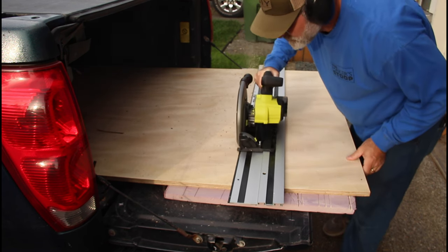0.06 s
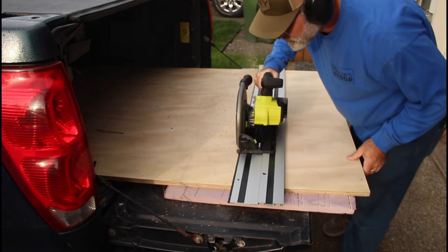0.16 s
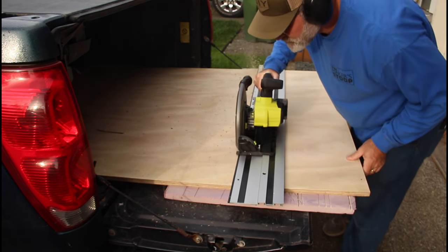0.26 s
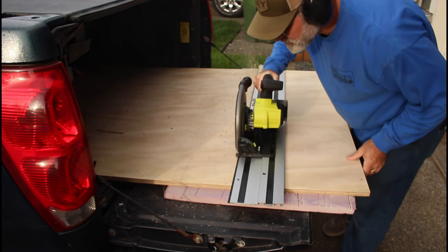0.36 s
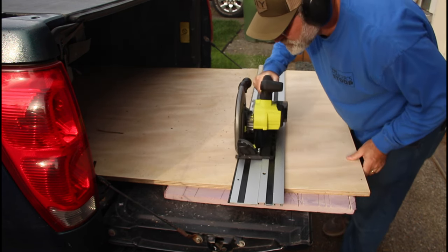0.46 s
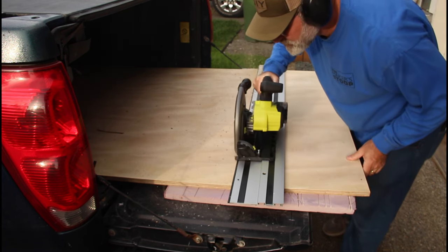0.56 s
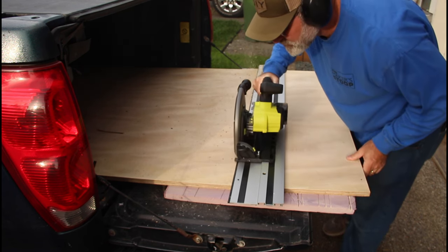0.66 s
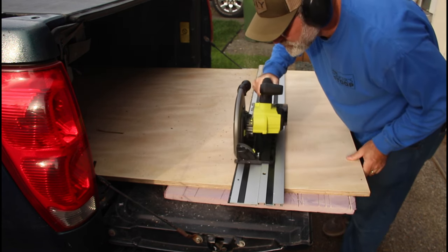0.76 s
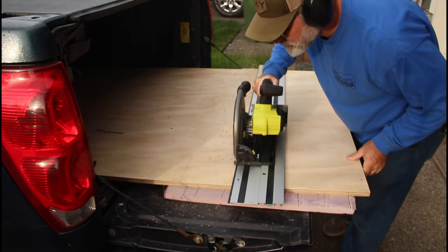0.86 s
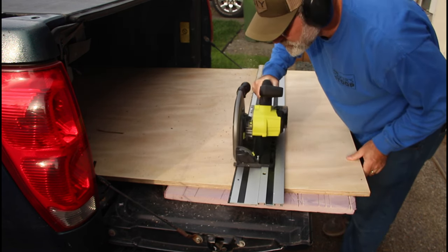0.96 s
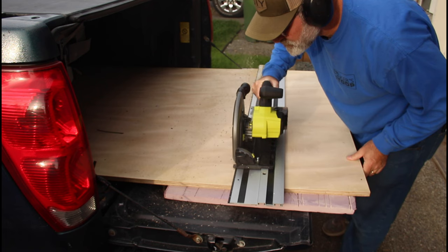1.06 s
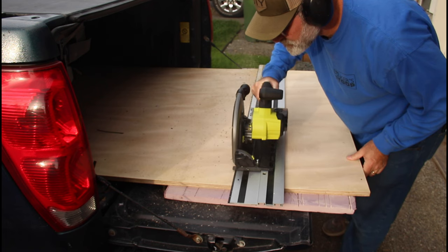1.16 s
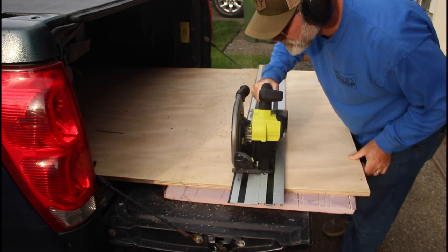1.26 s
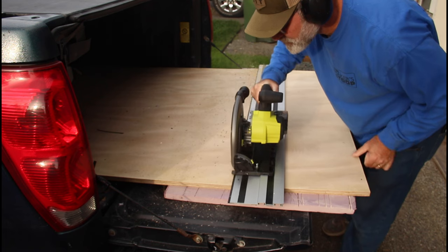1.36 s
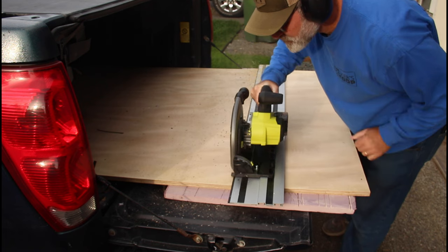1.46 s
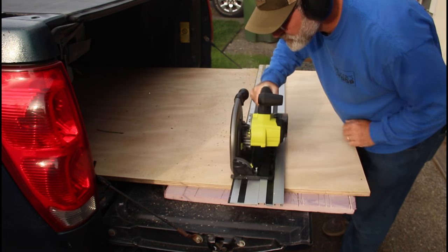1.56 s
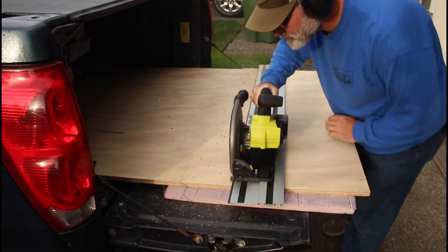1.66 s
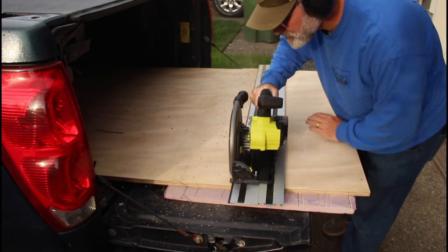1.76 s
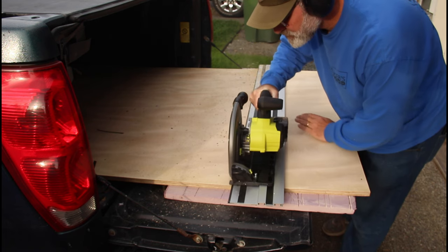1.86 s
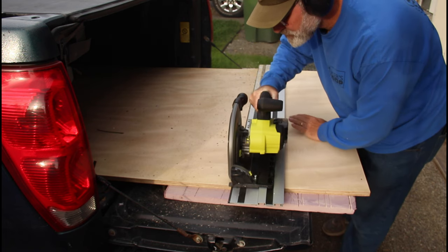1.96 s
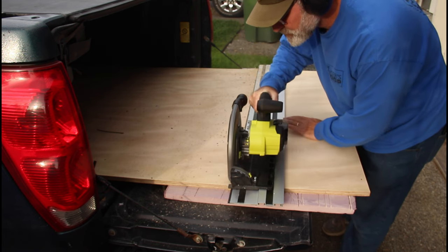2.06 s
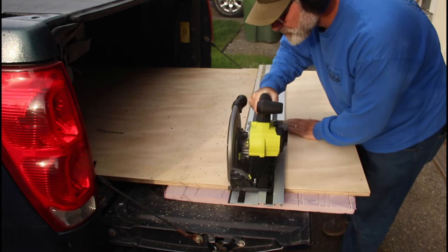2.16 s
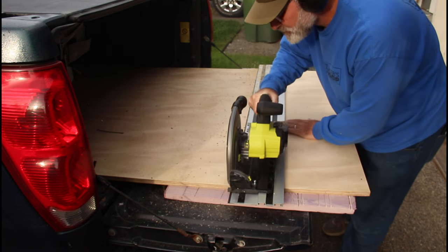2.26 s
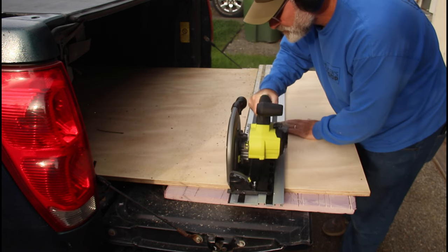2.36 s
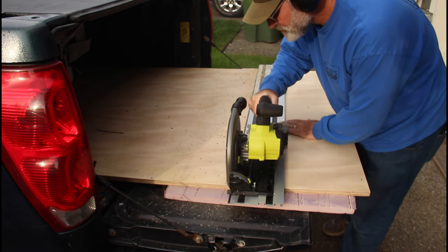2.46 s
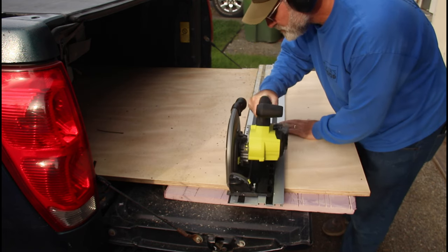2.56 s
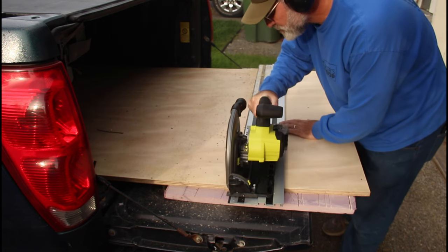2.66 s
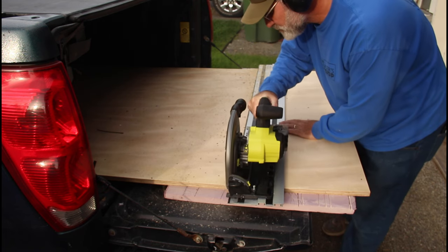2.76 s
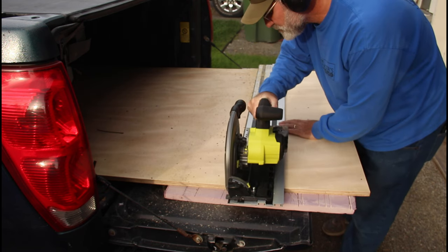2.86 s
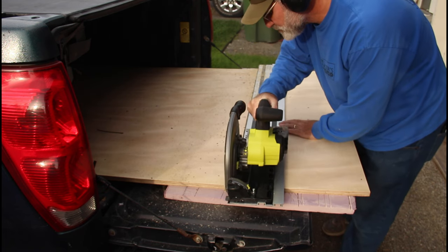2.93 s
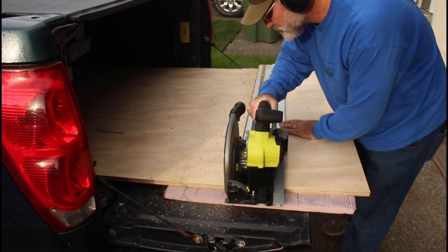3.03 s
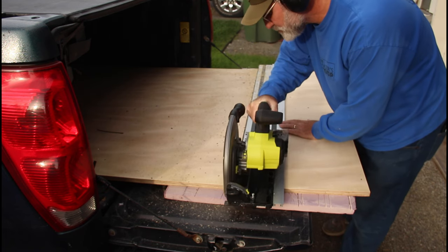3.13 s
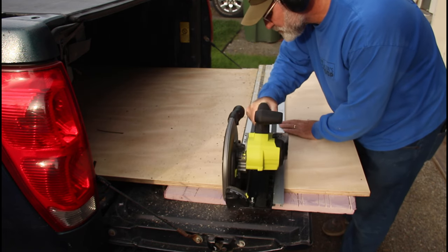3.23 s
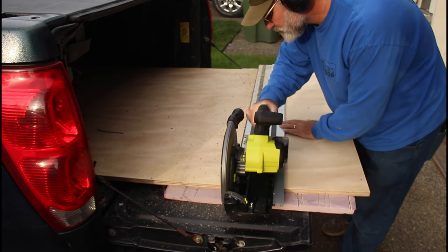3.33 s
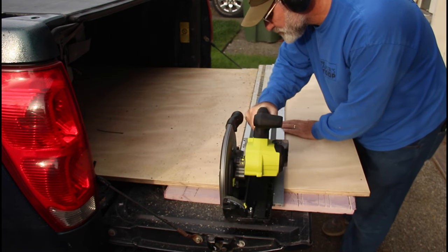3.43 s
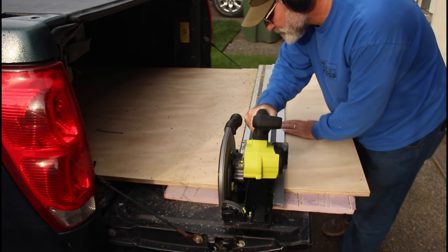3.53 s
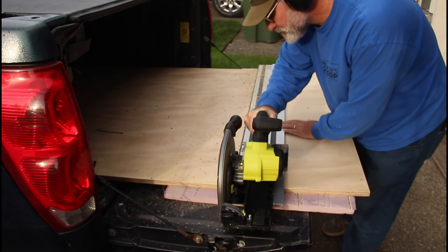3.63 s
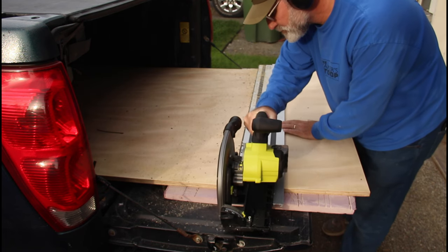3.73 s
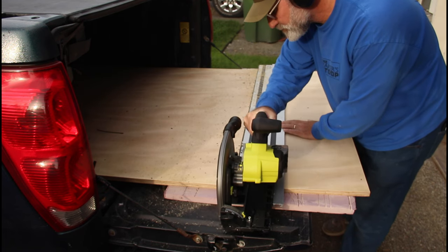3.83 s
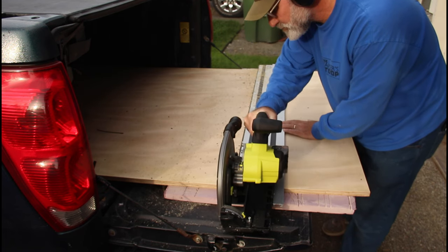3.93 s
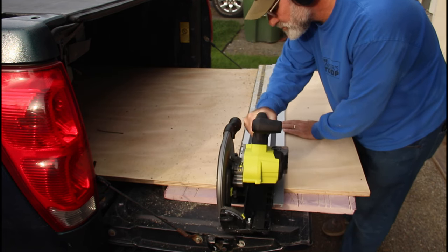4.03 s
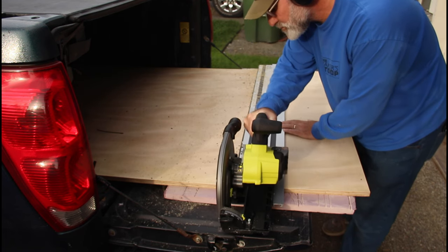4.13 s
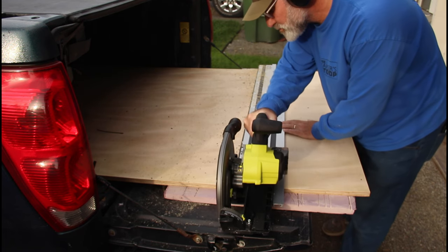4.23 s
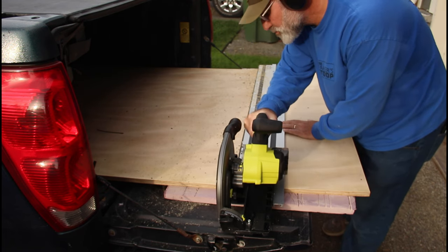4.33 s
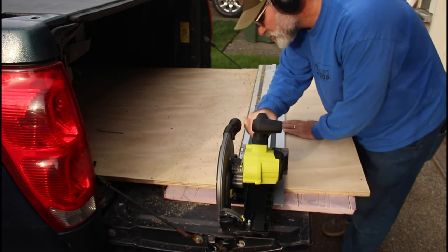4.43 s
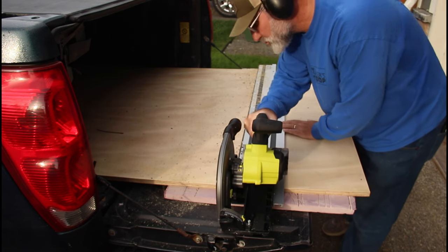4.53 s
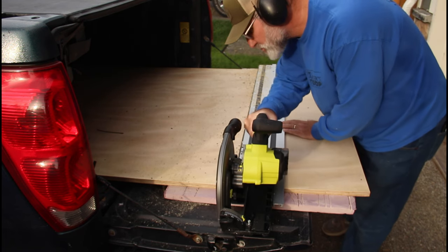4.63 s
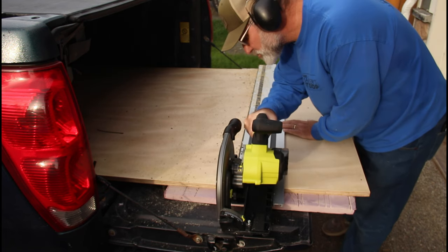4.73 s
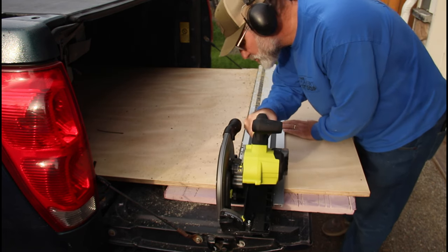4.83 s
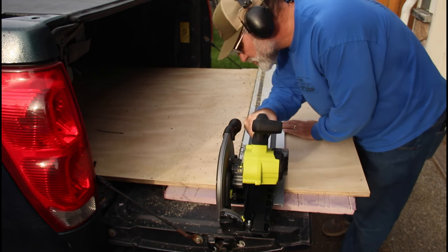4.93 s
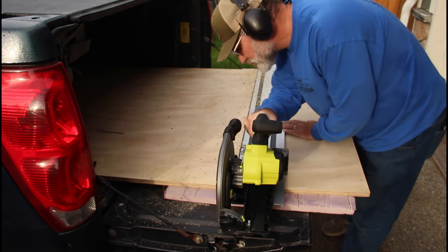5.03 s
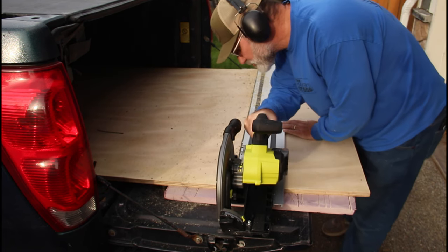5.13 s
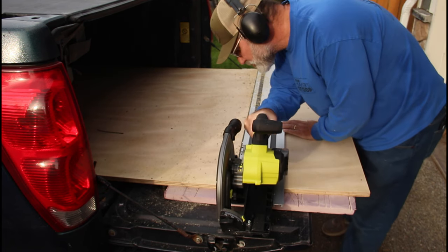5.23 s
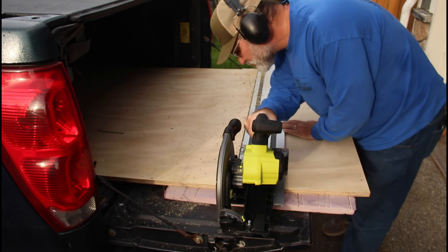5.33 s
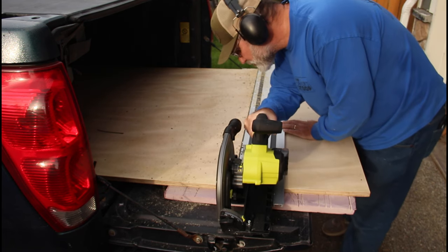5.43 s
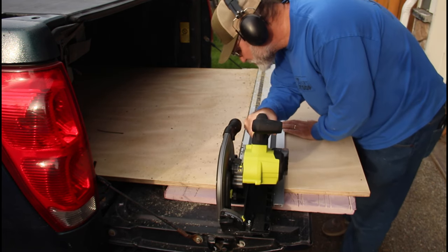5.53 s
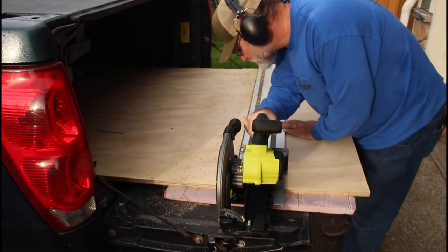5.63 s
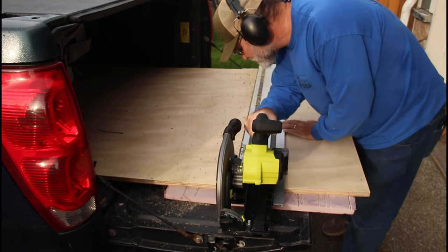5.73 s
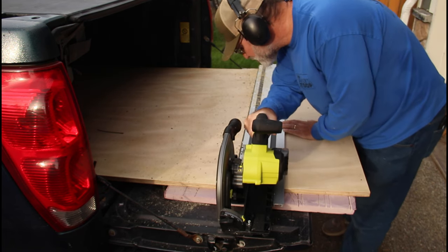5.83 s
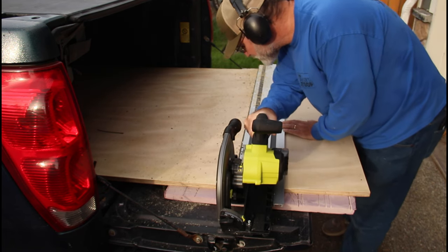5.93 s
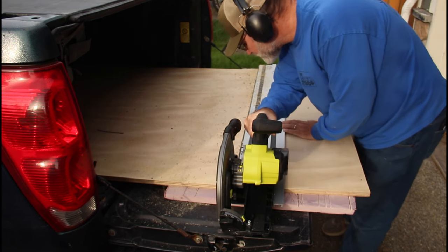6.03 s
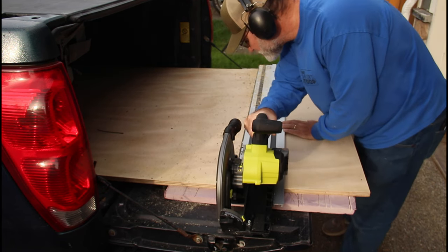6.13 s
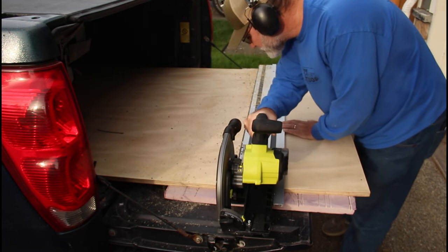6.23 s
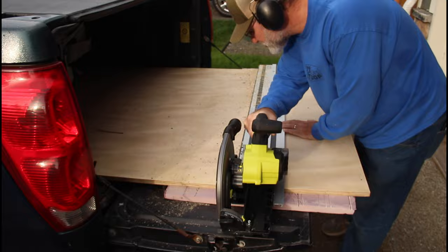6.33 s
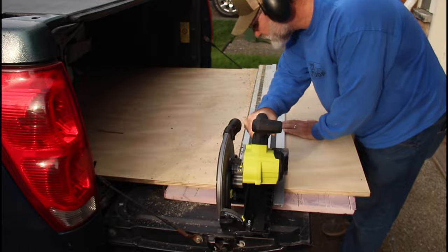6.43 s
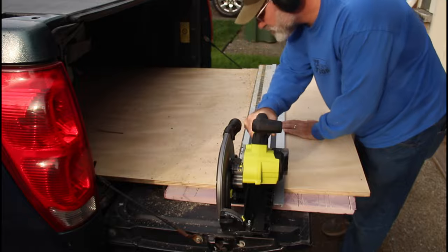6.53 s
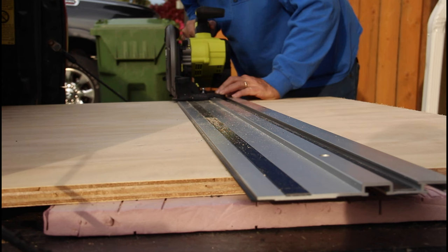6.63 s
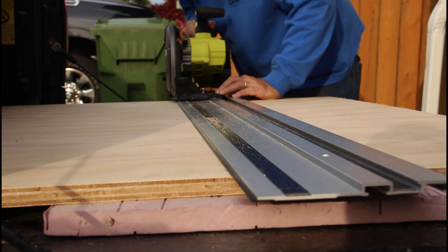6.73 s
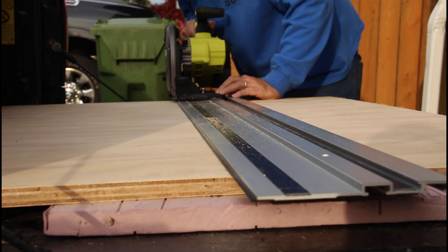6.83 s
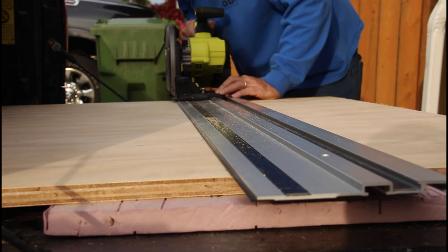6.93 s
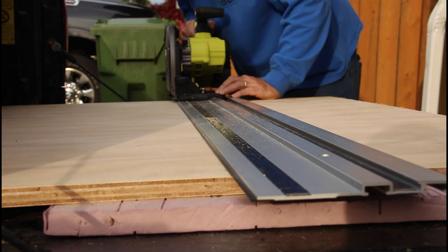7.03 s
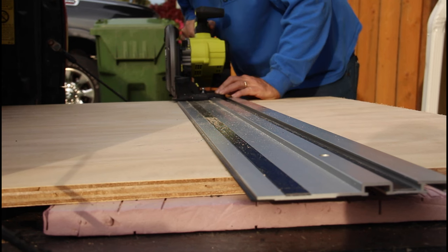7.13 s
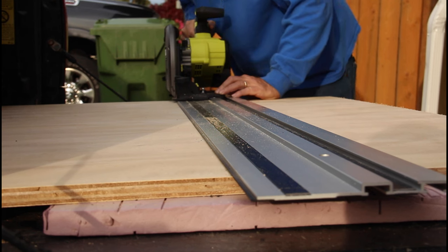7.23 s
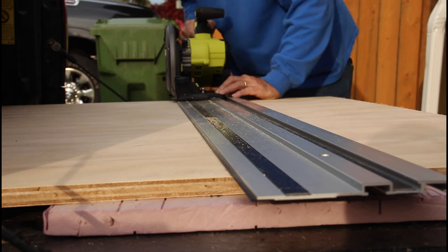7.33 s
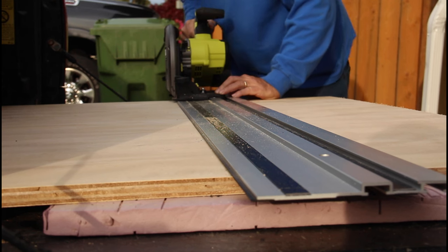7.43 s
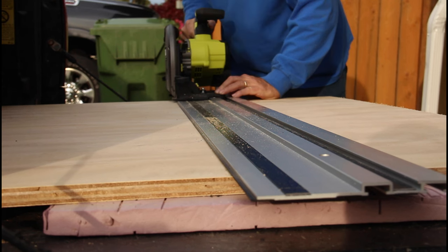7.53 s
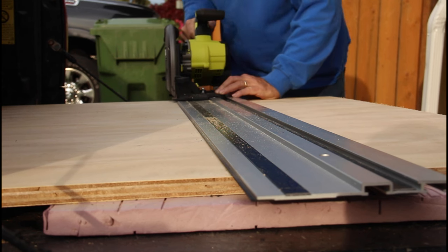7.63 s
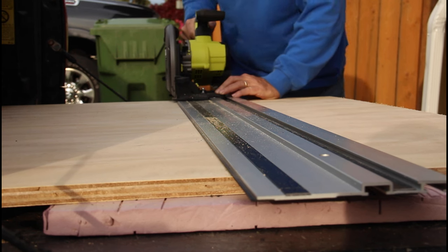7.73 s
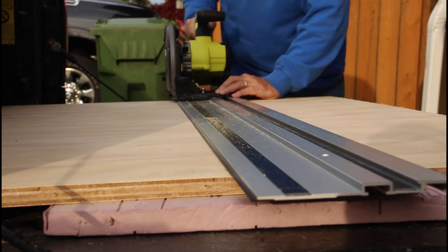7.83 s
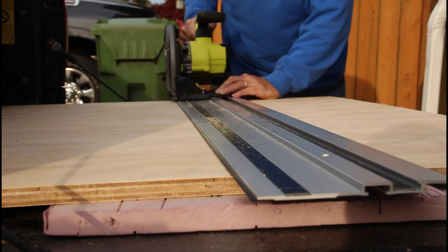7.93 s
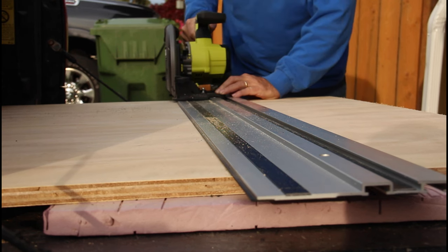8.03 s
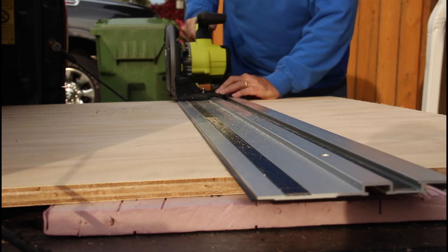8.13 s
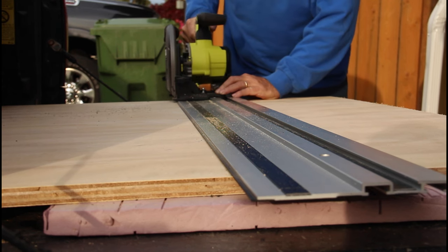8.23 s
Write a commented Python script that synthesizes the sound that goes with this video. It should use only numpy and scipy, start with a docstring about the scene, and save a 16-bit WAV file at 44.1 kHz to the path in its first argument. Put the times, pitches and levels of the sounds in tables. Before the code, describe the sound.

A dry, centred outdoor scene by a truck tailgate. From 0 to about 3.2 seconds a cordless circular saw cuts plywood close by: a strong, slightly wavering motor and gear whine, rough housing buzz and bright hissing chips, over low breeze rumble. Around 3.2 to 3.4 seconds it breaks out of the wood; the pitch lifts a little, the hiss thins and the loose guard flutters quickly. At about 4.26 seconds the brake grips with a jolt and sharp knock, and the whine falls fast, then more slowly, ringing and fluttering, to a ticking crawl by 6.6 seconds with tiny clicks. The perspective changes to the far end of the sheet, with quiet street air. A small knock comes at 6.87, a trigger click at 7.08, then the saw whirs upward with faint high whistles until about 7.7, bites near 8 and grows rougher as it cuts to the end.

```python
"""A cordless circular saw on a rail finishes a cut in plywood on a tailgate, near at hand, over breeze rumble.
It breaks out of the wood and runs free, its guard fluttering; the brake whines it down to a crawl.
From the far end of the sheet, over a quiet street, the trigger clicks and the saw spins up and bites again.
Sines locked to the shaft make the shaft, gear and fan tones; filtered noise throbbing with the
shaft and blade rings the housing, gearbox and blade, with a hiss of chips and air on top."""
import sys
import numpy as np
from scipy import signal
from scipy.fft import rfft, irfft
from scipy.io import wavfile
from scipy.ndimage import uniform_filter1d

SR = 44100
rng = np.random.default_rng(int(sys.argv[2]) if len(sys.argv) > 2 else 0)


def put_to_file(sound):
    """Save the sound as 16-bit audio at rate SR, in the file named by the first command-line argument."""
    columns = np.atleast_2d(sound).T  # one column per channel
    safe = np.clip(columns, -1, 1)
    whole_steps = np.round(safe * 32767)
    wavfile.write(sys.argv[1], SR, whole_steps.astype(np.int16))


N = 365148
T = np.arange(N) / SR  # t/s
FREE_HZ, SAG_HZ = 476, 30  # shaft speed running free; drop below it that counts as full load
BLADE_RATIO = 7 / 46  # blade turns per shaft turn

# cut and free run: [t/s, shaft f/Hz, bite (1 = full), main mesh swell level/dB, upper partners' swell level/dB]
NEAR_RUN = [(0.0, 441, 0.81, 0, 2.5), (0.39, 444, 0.87, -8, 1.5), (0.8, 444.6, 0.9, 0.5, 2),
            (1.1, 444.8, 1, 5.5, -7.5), (1.45, 440.8, 1.02, 4.5, -1.5), (1.72, 442.7, 0.97, 5, 8),
            (1.88, 443.7, 1.05, -1, -2), (2.11, 443.5, 0.98, 5, 6), (2.31, 447.5, 1, -7, 8),
            (2.45, 450, 0.99, 1.5, 5), (2.64, 452.8, 0.98, 0.5, 5.5), (2.9, 451.2, 1.16, -5.5, 7),
            (3.08, 446.4, 1.14, -9.5, 5.5), (3.18, 450.2, 1.04, -4.5, 10.5), (3.3, 466.2, 0.34, 3.5, 2),
            (3.42, 472, 0.022, 5.5, 17.5), (3.7, 476, .01, 9, -1), (4.255, 475.8, 0.012, 7, -5)]
# spin-up and second bite: [t/s, shaft f/Hz, bite (1 = full)]
FAR_RUN = [(7.078, 30.33, 0.0067), (7.128, 59.06, 0.011), (7.278, 172.5, .01), (7.386, 251.4, .01),
           (7.508, 337.5, 0.011), (7.63, 419.8, 0.0097), (7.71, 450.4, .02), (7.8, 458.3, 0.066),
           (8.094, 463, 0.2), (8.28, 455.7, 0.55)]
# level law of each layer before its trims:
# [free-speed level/dB, dB added by full bite, dB lost per halving of speed, dB lost per halving squared]
NEAR_LAWS = dict(shaft=(-40.5, 2.5, -4, 0), mesh=(-40.5, 6.5, 4.5, 3.5), fan=(-44.5, 2, -4.5, 2),
             housing=(-45.5, 5, 13, 1.5), gearbox=(-41.5, 7.5, 23.5, 1.5), blade=(-41.5, 2.5, -3, -1.5),
             hiss=(-49, 16.5, -4.5, -1.5))
FAR_LAWS = dict(shaft=(-52.5, 5, 0, 8.5), mesh=(-44.5, 18, -4, 2.5), fan=(-45.5, -15, 21, 0),
            housing=(-47.5, 6, 5, -1), gearbox=(-45, 4, 0.5, 0.84), blade=(-44, -3, 5.5, 0.2),
            hiss=(-53.5, 21.5, 8.5, -0.5))
# tones of each family as multiples of the shaft speed: [multiple]
SHAFT_ORDERS = (1, 2, 3, 4, 2 * BLADE_RATIO, 4 * BLADE_RATIO)
MESH_ORDERS = (7, 5, 6, 8, 14, 15, 7 + BLADE_RATIO, 7 + 2 * BLADE_RATIO, 7 + 4 * BLADE_RATIO, 7 + 8 *
               BLADE_RATIO)
FAN_ORDERS = (13, 26)
# balance within each family, one row per multiple: [free level/dB, loaded level/dB]
SHAFT_BALANCE = [(-1, 1), (0, -6.5), (-17, -11), (-14.5, -11), (-50, -31.5), (-32, -18)]
NEAR_MESH_BALANCE = [(-6, 0.5), (-19, -9), (-10, -7.5), (-20, -8), (-42.5, -8), (-37.5, -9), (-32.5, -24.5),
                     (-17.5, -11), (-5, -13), (-3, -26.5)]
FAR_MESH_BALANCE = [(-13, 0), (-26, -14), (-12, -7), (-12, -1), (-33, -1), (-37.5, 1), (-10, -6), (-10, -6),
                    (-10, -7), (-15, -22)]
FAN_BALANCE = [(8, -0.5), (-10, -14)]


def motor(run, laws, mesh_balance, treble_db, wobble_db, smear_db):
    """Shaft, gear mesh, fan and blade wobble under power; load shows as sag below free speed."""
    (hz, bite, *swells), gate = read(run)
    main_db, upper_db = swells or (0, 0)
    turns = np.cumsum(hz) / SR
    load = np.clip((FREE_HZ - hz) / SAG_HZ, 0, 1)
    shaft_db = law(laws["shaft"], hz, bite) + passing("shaft", hz)
    mesh_db = law(laws["mesh"], hz, bite)
    fan_db = law(laws["fan"], hz, bite)

    wobble = undb(shaft_db + wobble_db) * np.sin(2 * np.pi * BLADE_RATIO * turns)
    shaft = undb(shaft_db) * family(SHAFT_ORDERS, SHAFT_BALANCE, turns, load, 0, wander_db=0.1)
    mesh = family(MESH_ORDERS, mesh_balance, turns, load, treble_db, wander_db=1.0, rate=27,
                  main_db=main_db, upper_db=upper_db, lit_hz=None if swells else hz)
    smear = undb(smear_db) * load * blur(turns, 7.0, 2.2)  # uneven teeth smear the mesh
    fan = undb(fan_db) * family(FAN_ORDERS, FAN_BALANCE, turns, load, treble_db, wander_db=1.5)
    return gate * (wobble + shaft + undb(mesh_db) * (mesh + smear) + fan)


# how well the casing radiates a passing tone: [f/Hz, level/dB]
CASING = [(200, -28), (400, -11), (750, -9), (1000, 0), (1280, 1), (1550, -14), (1900, -1), (2250, -22),
          (2600, 4), (3150, 2), (3350, -13), (3700, -4), (4100, -4), (4400, -20), (12000, -30)]
# one mesh partner crosses a gearbox mode: [t/s, width/s, level/dB]
PARTNER_RING = (2.87, 0.13, 8)


def family(orders, balance, turns, load, treble_db, wander_db=2.5, rate=25, lit_hz=None,
           main_db=0, upper_db=0):
    """Tones locked to the shaft; each wavers by itself and the balance shifts with load."""
    ring_s, ring_width_s, ring_db = PARTNER_RING
    if lit_hz is None:
        jitter, jitter_rate = 0.1, rate
    else:
        jitter, jitter_rate = 0.9, 80
    tones = 0
    for m, (free_db, loaded_db) in zip(orders, balance):
        ringing_partner = 7.2 < m < 7.4
        db = free_db + (loaded_db - free_db) * load + treble_db * (m > 13) + wander_db * walk(rate)
        db = db + main_db * (m == 7) + upper_db * (m == 8 or ringing_partner)
        db = db + ringing_partner * ring_db * np.exp(-((T - ring_s) / ring_width_s) ** 2)
        if lit_hz is not None:  # a sweeping tone lights up on the casing resonances and breaks up
            db = db + 0.8 * along(CASING, m * lit_hz) + 3.5 * walk(30)
        phase = 2 * np.pi * (m * turns + rng.random()) + jitter * walk(jitter_rate)
        tones = tones + np.sqrt(2) * undb(db) * np.sin(phase)
    return tones


# shaft speed under the brake, falling geometrically between points: [t/s, shaft f/Hz]
COAST_RUN = [(4.255, 475), (4.29, 446), (4.35, 402), (4.51, 340), (4.8, 251), (5.02, 195), (5.22, 151),
             (5.59, 87.8), (6.02, 46), (6.3, 29), (6.607, 15)]


def coasting():
    """Shaft speed under the brake, and its gate."""
    (log_hz,), gate = read([(s, np.log(hz)) for s, hz in COAST_RUN])
    return np.exp(log_hz), gate


# level laws under the brake, before trims, with those of the pole whine and the swish first:
# [free-speed level/dB, dB added by full bite, dB lost per halving of speed, dB lost per halving squared]
POLE_LAW = (-41, 0, 1.5, 1.1)
SWISH_LAW = (-52, 0, .1, .35)
COAST_LAWS = dict(shaft=(-43, 0, 10, 3), pole=POLE_LAW, swish=SWISH_LAW, housing=(-48.5, 0, -1.5, 1.0),
              gearbox=(-44, 0, 8.5, -0.63), blade=(-45.5, 0, 1.5, 1.55), hiss=(-48, 0, 9, 0))
# tones of the braked motor: [multiple of shaft f, level/dB re pole whine, dB gained per halving, up to three]
POLES = [(2, -2, -6), (4, -10, 2), (5, -8, 2), (6, -7, 1), (7, -2, 3.5), (8, 4, -2.5), (12, -35, 14),
         (16, -1, 0), (20, -11, 0), (24, -47, 17), (28, -19, 1), (40, -16, 0)]
# noise bands sweeping with the shaft: [multiple of shaft f, width in multiples, level/dB]
SWISH = [(14.75, .9, 0), (46.7, 2.5, -10), (62.5, 3, -6), (80, 5, -10), (96, 5, -12), (55, 50, -2),
         (160, 110, -8), (108, 40, -7)]
# how the blade passes a swish on: [f/Hz, level/dB]
BLADE_LIT = [(2500, -22), (4200, -5), (5200, 8), (6500, 1), (8000, -7), (15500, -2)]
COAST_MESH_DB, COAST_FAN_DB = 10, -43  # loose gear teeth re pole whine; fan family at free speed


def brake():
    """The shorted motor cogs past its poles; each falling tone lights up on the casing resonances."""
    hz, gate = coasting()
    shaft_db, pole_db, swish_db = (law(COAST_LAWS[k], hz, 0) for k in ("shaft", "pole", "swish"))
    turns = np.cumsum(hz) / SR
    halvings = np.log2(FREE_HZ / hz)

    def lit(multiple):
        """Pole-whine level as the casing radiates it at a multiple of the shaft speed."""
        return undb(pole_db + along(CASING, multiple * hz))

    # the small casing cannot radiate the slowest turns
    radiated = np.clip(hz / 90 - 1, 0, 1)
    tones = radiated * undb(shaft_db + passing("shaft", hz)) * np.sin(2 * np.pi * turns)
    for m, db, gain_db in POLES:
        broken = undb(db + gain_db * np.minimum(halvings, 3) + 3 * walk(18))
        roughness = (.5 + .25 * halvings) * walk(90)
        tones += lit(m) * broken * np.sin(2 * np.pi * m * turns + roughness)
    # the teeth chatter more loosely as the speed drops
    tones += undb(COAST_MESH_DB) * (1 - hz / 520) * lit(7.46) * blur(turns, 7.6, 2.2)
    # fan noise dies steeply with speed
    fan = family(FAN_ORDERS, FAN_BALANCE, turns, 0, 0, wander_db=3)
    tones += undb(COAST_FAN_DB) * (hz / FREE_HZ) ** 8 * fan

    swish = 0
    for m, width, db in SWISH:
        band_db = swish_db + db + 3.8 * walk(40) + along(BLADE_LIT, m * hz)
        audible = m * hz < .4 * SR
        swish = swish + undb(band_db) * audible * blur(turns, m, width)
    swish = gate * swish
    modes = [mode[:3] for mode in GEARBOX_MODES + BLADE_MODES + HISS_MODES]
    ringing = colour(swish, [(100, 0), (20000, 0)], modes)
    return gate * (tones + ringing * np.std(swish))


# relative noise spectrum of each part: [f/Hz, level/dB per Hz]
HOUSING = [(40, -45), (203, -24.5), (268, -18), (393, -10), (443, -10), (500, -9.5), (637, -3.5),
           (812, -3.5), (885, -7.5), (965, -6), (1110, -5), (2500, -15), (3250, -57.5)]
GEARBOX = [(1350, -18), (2300, -9), (2520, -11), (2660, -5.5), (3240, -0.5), (3670, -5), (3940, -10),
           (4300, -11.5), (5590, -33), (9460, -120)]
GEARBOX_FAR = [(1500, -36), (2100, -1.5), (2790, 3), (3300, -2.5), (3700, -6), (4300, -18), (5600, -36)]  # heard from the far end
BLADE = [(2350, -39.5), (4000, 0), (5110, 5.5), (5510, 0), (6120, 2.5), (6540, -2.5), (7460, -6.5),
         (7860, -9), (8300, -1.5), (10800, -56.5)]
HISS = [(4470, -18), (7600, 1), (8260, -4), (9700, 0), (10900, -3), (11400, -4.5), (14700, -6),
        (15300, -16), (15900, -26.5)]
# housing resonances, at speed and at a crawl: [f/Hz, width/Hz, level/dB above the spectrum]
HOUSING_MODES = [(181, 15, 7), (332.4, 26, 10), (643, 17, 7), (1116, 47, 8), (1252, 91, 4.5),
                 (2070, 46, -6.5)]
HOUSING_CRAWL_MODES = [(332, 29, 8), (1134, 290, 9), (2025, 97, 9.7)]
# resonances of the other parts: [f/Hz, width/Hz, level/dB above the spectrum, dB gained late in the cut]
GEARBOX_MODES = [(2780, 60, 4, 0), (3160, 40, 6, 1), (3330, 50, 5, 2), (3600, 50, 6, 1)]
BLADE_MODES = [(4400, 30, 5, 3), (4570, 30, 5, 0), (4980, 25, 4, 9), (5330, 50, 5, 0), (5760, 40, 7, -2),
               (6200, 50, 11, -5), (6700, 220, 8, 0), (7230, 30, 7, -3), (7870, 40, 7, 8)]
HISS_MODES = [(8714, 30, 6, 8), (9010, 30, 3, 8), (9400, 40, 6, 2), (9960, 40, 7, 2), (10280, 25, 7, -3),
              (10600, 60, 5, 3), (10900, 40, 9, -1), (11600, 35, 7, -3), (12280, 35, 6, 3),
              (14700, 50, 6, 0)]
JOLT_S, JOLT_RISE_S, JOLT_FALL_S, JOLT_DB = 4.258, .015, .05, 7  # the casing is shaken as the brake grips
COGS_PER_TURN, COG_FROM_HZ, COG_DB = 4, 60, 3  # crawling rotor catches on its poles; dB of throb per halving


def body():
    """Impacts ring the housing, gearbox and blade; chips and air hiss on top."""
    (near_hz, near_bite, *_), near = read(NEAR_RUN)
    (far_hz, far_bite), far = read(FAR_RUN)
    coast_hz, coast = coasting()
    turns = np.cumsum(near * near_hz + coast * coast_hz + far * far_hz) / SR
    halvings = coast * np.log2(FREE_HZ / coast_hz)

    jolt_rise = np.clip((T - JOLT_S) / JOLT_RISE_S, 0, 1)
    jolt_fall = np.exp(-np.maximum(T - JOLT_S - JOLT_RISE_S, 0) / JOLT_FALL_S)
    jolt_db = JOLT_DB * jolt_rise * jolt_fall
    gain = {}
    for k in ("housing", "gearbox", "blade", "hiss"):
        coast_db = law(COAST_LAWS[k], coast_hz, 0) + passing(k, coast_hz) + jolt_db * (k != "hiss")
        gain[k] = (near * undb(law(NEAR_LAWS[k], near_hz, near_bite))
                   + far * undb(law(FAR_LAWS[k], far_hz, far_bite))
                   + coast * undb(coast_db))

    teeth = grit(turns, 0.082, 0.071, tick_db=2.0, grain_db=0.83)
    chips = grit(turns, 0.12, 0.024, tick_db=-13.5, grain_db=1.3)
    crawl = np.clip(0.49 * halvings, 0, 1)
    at_speed = colour(teeth, HOUSING, HOUSING_MODES)
    at_crawl = colour(teeth, HOUSING, HOUSING_CRAWL_MODES)
    housing = undb(4.5) * ((1 - crawl) * at_speed + crawl * at_crawl)
    gearbox = undb(2.5) * part(teeth, GEARBOX, GEARBOX_MODES, halvings, near_bite)
    rising = far * np.clip((FREE_HZ - far_hz) / 150, 0, 1)
    # the lower gearbox ring leads while the speed climbs
    gearbox += rising * (undb(1.5) * colour(teeth, GEARBOX_FAR) - gearbox)
    blade = part(chips, BLADE, BLADE_MODES, halvings, near_bite)
    hiss = part(chips, HISS, HISS_MODES, halvings, near_bite)

    cog_depth_db = COG_DB * np.maximum(np.log2(COG_FROM_HZ / coast_hz), 0)
    cog_db = coast * cog_depth_db * np.cos(2 * np.pi * COGS_PER_TURN * turns + 1.05 * walk(26))
    upper = gain["gearbox"] * gearbox + gain["blade"] * blade + gain["hiss"] * hiss
    return gain["housing"] * housing * undb(cog_db / 2) + upper * undb(cog_db)


def grit(turns, shaft_depth, blade_depth, tick_db, grain_db):
    """Tooth and chip impacts: noise that throbs with each shaft and blade turn, with loose ticks."""
    blade = BLADE_RATIO * turns
    pattern = sum(np.cos(2 * np.pi * (k * blade + rng.random())) for k in range(1, 5))
    throb = (1 + shaft_depth * np.cos(2 * np.pi * turns)) * (1 + blade_depth * pattern)
    # a loose guard taps some thirty times a second, a little unevenly
    taps = np.diff(np.cumsum(30 * (1 + .35 * walk(40))) // SR, prepend=0) > 0
    ticks = np.convolve(taps, np.exp(-np.arange(200) / 19.0))[:N]
    grain = rng.standard_normal(N) * undb(grain_db * walk(270))
    return grain * throb * (1 + undb(tick_db) * ticks)


LATE_FROM_S, LATE_FULL_S = 1.4, 2.35  # the sheet lets go of the blade toward the end of the cut
FREE_RING_DB, RING_PER_HALVING, FLUTTER_DB = 8, .35, .6  # slowing parts ring more freely and flutter


def part(x, points, modes, halvings, bite):
    """A part rung by impacts; modes trade places along the cut, stand out and flutter under the brake."""
    share = np.clip(RING_PER_HALVING * halvings, 0, 1)
    progress = (T - LATE_FROM_S) / (LATE_FULL_S - LATE_FROM_S) + 0.38 * walk(1.2)
    late = np.clip(progress, 0, 1) * np.clip(bite, 0, 1)

    def rung(late_share, extra_db):
        """The part with a share of the late mode gains and all modes raised."""
        humps = [(hz, width, db + late_share * gained + extra_db) for hz, width, db, gained in modes]
        return colour(x, points, humps)

    cutting = (1 - late) * rung(0, 0) + late * rung(1, 0)
    flutter = undb(FLUTTER_DB * halvings * walk(45))
    return ((1 - share) * cutting + share * rung(0, FREE_RING_DB)) * flutter


def guard():
    """Running free, the blade guard flutters against the housing in quick, fairly even taps."""
    (hz, *_), gate = read(NEAR_RUN)
    free = gate * np.clip((hz - 460) / 10, 0, 1)
    taps_per_s = 53 * (1 + .12 * walk(30))
    taps = np.diff(np.cumsum(taps_per_s) // SR, prepend=0) * undb(2.2 * walk(60))
    burst = np.convolve(taps, np.exp(-np.arange(400) / 150.))[:N]
    ring = colour(rng.standard_normal(N), [(2600, -14), (3480, 5), (3950, -10), (4380, 0), (4800, -20)])
    return undb(-29.5) * free * burst * ring


CHOPPER_HZ, CHOPPER_END_S, CHOPPER_DB = 10000, 7.5, -67  # carrier, end of whistles, peak of each whistle


def chopper():
    """Thin switching whistles that fan out from the carrier while the motor starts."""
    (hz, *_), gate = read(FAR_RUN)
    turns = np.cumsum(hz) / SR
    fade = gate * np.clip((CHOPPER_END_S - T) / .05, 0, 1) * np.clip(hz / 200, 0, 1)
    whistles = sum(np.sin(2 * np.pi * (CHOPPER_HZ * T + m * turns)) for m in (4, 8))
    return undb(CHOPPER_DB) * fade * whistles


# knocks of trigger, gear backlash and the last teeth, before the low cut:
# [t/s, crack level/dB, treble level/dB re crack, tail level/dB re crack, tail t60/s]
KNOCKS = [(4.308, -24, -8, -6, 0.07), (6.567, -50, -22, -4, 0.05), (6.587, -57, -15, -6, 0.03),
          (6.600, -51, -15, -5, 0.02), (6.867, -51.5, -4.5, -7, 0.12), (7.079, -52, -12, -6, 0.08)]
# relative spectrum of the knocks below the treble: [f/Hz, level/dB per Hz]
KNOCK_LOW = [(250, 5.5), (500, 9), (1100, 4.5), (1700, 10), (2500, -5), (3400, -8.5), (4200, -20)]
# gears cross their play as the torque reverses: [t/s, rise/s, level/dB]
BACKLASH = (4.258, .03, -24)


def knocks():
    """Short cracks through housing and blade with a faint tail, and one ring of the gearbox."""
    low, high = rng.standard_normal((2, N))
    shapes = np.zeros((2, N))
    for s, db, treble_db, tail_db, t60 in KNOCKS:
        age = np.maximum(T - s, 0)
        tail = undb(tail_db) * np.exp(-np.log(1000) * age / max(t60, .005))
        shapes += undb([[db], [db + treble_db]]) * (T >= s) * (np.exp(-age / 0.00109) + tail)
    low = colour(low, KNOCK_LOW) * shapes[0]
    treble = [(2500, 7.5), (4800, 7.5), (6500, -12), (8500, 9), (12000, -25), (15500, -1)]
    high = colour(high, treble) * shapes[1]
    low_cut = signal.butter(4, 300, "high", fs=SR, output="sos")
    cracks = signal.sosfilt(low_cut, low + high)

    s, rise_s, db = BACKLASH
    swell = np.clip((T - s) / rise_s, 0, 1) * np.exp(-np.maximum(T - s - rise_s, 0) / 0.0056)
    turns = np.cumsum(coasting()[0]) / SR
    mesh_tone = np.sin(2 * np.pi * MESH_ORDERS[0] * turns)
    return cracks + undb(db) * swell * mesh_tone * (1 + 0.42 * walk(200))


# relative spectra of the breeze at the tailgate and the street at the far end: [f/Hz, level/dB per Hz]
YARD_NEAR = [(12, -41), (20, -0.5), (65, -37.5), (102, -7.5), (145, -19.5), (172, -13), (300, 1.5),
             (390, -34.5), (660, -120)]
YARD_FAR = [(12, -25.5), (20, -4.5), (32, -18), (68, -17.5), (113, -18), (421, -17.5), (572, -24.5),
            (639, -23.5), (1750, -33.5), (3060, -36), (15900, -41.5)]
YARD_NEAR_DB, YARD_FAR_DB = -67.5, -76.5  # centre of each wandering level
NEAR_END_S = 6.607


def yard():
    """Breeze rumble at the tailgate, heard until the scene moves to the far end of the sheet, over the quiet
    street noise throughout."""
    breeze = undb(YARD_NEAR_DB + 4.0 * walk(4)) * colour(rng.standard_normal(N), YARD_NEAR)
    street = undb(YARD_FAR_DB + 1.0 * walk(11)) * colour(rng.standard_normal(N), YARD_FAR)
    return (T < NEAR_END_S) * breeze + street


# each part rings up as the speed passes its resonance: [shaft f/Hz, width/octaves, level/dB]
RING_UP = dict(shaft=(173.4, .12, 9.3), gearbox=(260, 0.52, 1.6), blade=(42, 1, 14.5), hiss=(92, 0.8, 4.1),
           housing=(203, 0.14, 1.9))


def passing(name, hz):
    """Extra dB while the speed crosses the resonance of a part."""
    centre_hz, octaves, db = RING_UP[name]
    return db * np.exp(-(np.log2(hz / centre_hz) / octaves) ** 2)


def law(row, hz, bite):
    """Level in dB of a layer at a shaft speed and a depth of bite."""
    free_db, bite_db, slope_db, bend_db = row
    halvings = np.log2(FREE_HZ / hz)
    return free_db + bite_db * bite - slope_db * halvings - bend_db * halvings ** 2


def blur(turns, multiple, width):
    """A blurred line: noise read at shaft speed rides on the tone; rms near 1."""
    knots = rng.standard_normal((2, 4096))
    a, b = (np.interp(width * turns % 4095, np.arange(4096), k) for k in knots)
    angle = 2 * np.pi * multiple * turns
    return 0.97 * (a * np.cos(angle) + b * np.sin(angle))


def colour(x, points, modes=()):
    """Shape by (f/Hz, level/dB) points, at -90 dB outside them, with resonant humps on top; rms 1."""
    hz = np.arange(N // 2 + 1) * SR / N + 1  # 1 Hz up, so the log stays finite
    p = np.transpose(points)
    gain = undb(np.interp(np.log(hz), np.log(p[0]), p[1], -90, -90))
    for centre_hz, width, db in modes:
        gain = gain * (1 + (undb(db) - 1) / (1 + (2 * (hz - centre_hz) / width) ** 2))
    return unit(irfft(rfft(x) * gain, N))


def along(table, hz):
    """A (f/Hz, level/dB) table read at a moving frequency."""
    p = np.transpose(table)
    return np.interp(np.log(hz), np.log(p[0]), p[1])


def read(table):
    """Columns of a curve at every sample, and a gate that is open over its span."""
    s, *columns = np.transpose(table)
    inside = 1. * ((T >= s[0]) & (T <= s[-1]))
    gate = uniform_filter1d(inside, size=90, mode="nearest")
    return [np.interp(T, s, c) for c in columns], gate


def walk(rate):
    """Random levels held 1 / rate s and slewed twice."""
    k = int(SR / rate)
    steps = np.repeat(rng.standard_normal(N // k + 1), k)
    return 1.02 * uniform_filter1d(uniform_filter1d(steps, k), k)[:N]


def undb(db):
    """Decibels to amplitude ratio."""
    return np.exp(np.asarray(db) * np.log(10) / 20)


def unit(x):
    """Scale to rms 1."""
    return x / np.sqrt(np.mean(x ** 2))


def scene():
    """The saw near and far, its brake and rattles, over the yard; the same in both channels."""
    near = motor(NEAR_RUN, NEAR_LAWS, NEAR_MESH_BALANCE, treble_db=2.0, wobble_db=-56.0, smear_db=-9.5)
    far = motor(FAR_RUN, FAR_LAWS, FAR_MESH_BALANCE, treble_db=-12, wobble_db=-22, smear_db=-.5)
    mono = near + far + brake() + body() + chopper() + guard() + knocks() + yard()
    return np.array([mono, mono])


CEILING, TOP_HZ = .24, 15750  # soft limit in full-scale amplitude; edge of the steep treble cut


def record(dry):
    """Soft limiting rounds the loudest peaks, then a steep low-pass cuts the top."""
    rounded = CEILING * np.tanh(dry / CEILING)
    top_cut = signal.ellip(10, .2, 80, TOP_HZ, fs=SR, output="sos")
    return signal.sosfilt(top_cut, rounded)


dry = scene()
out = record(dry)
put_to_file(out)
```